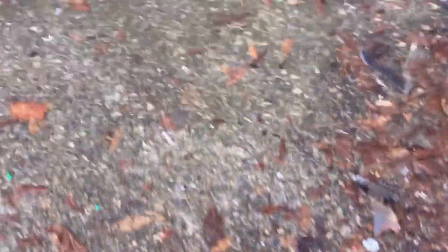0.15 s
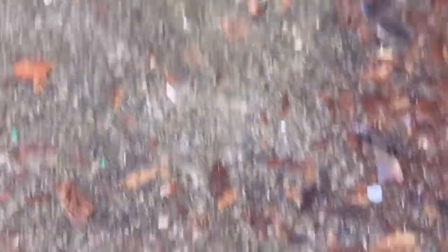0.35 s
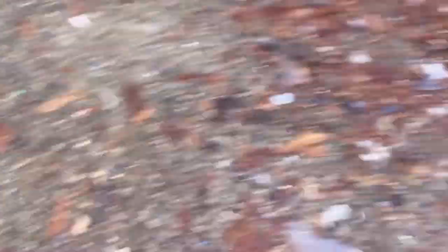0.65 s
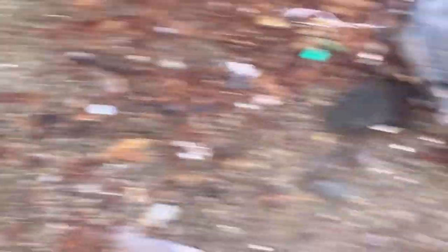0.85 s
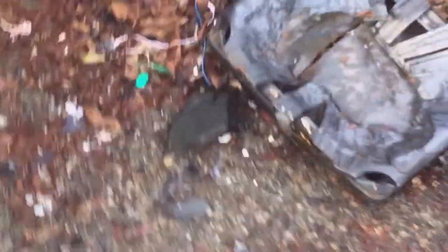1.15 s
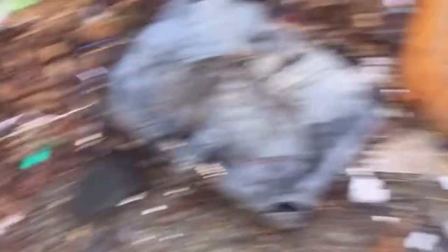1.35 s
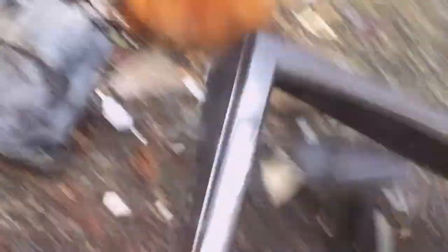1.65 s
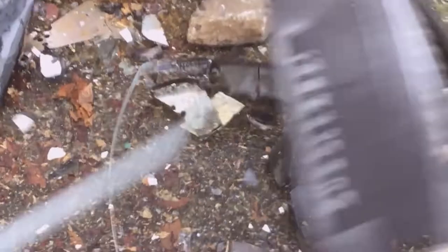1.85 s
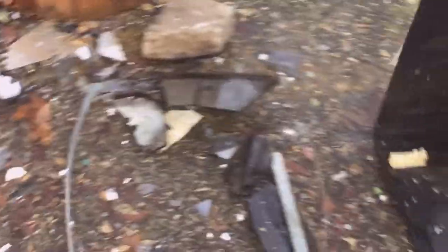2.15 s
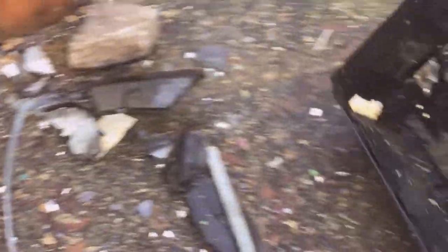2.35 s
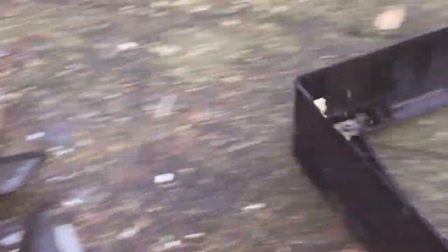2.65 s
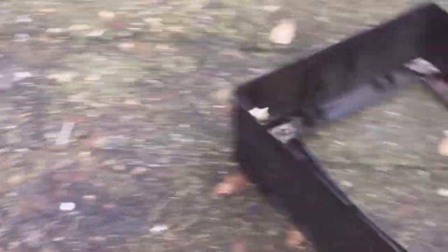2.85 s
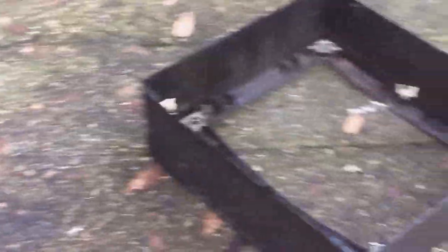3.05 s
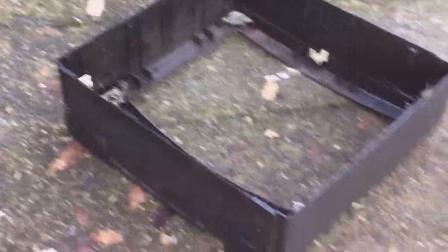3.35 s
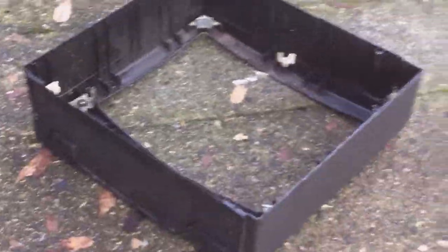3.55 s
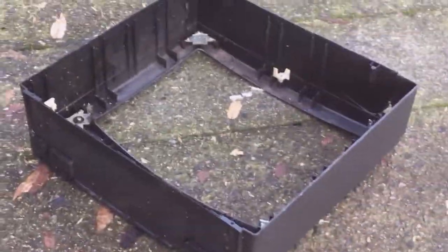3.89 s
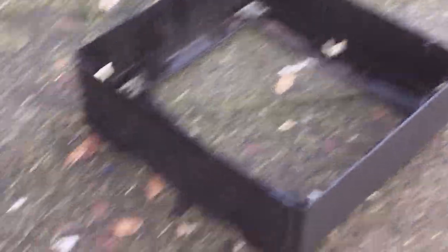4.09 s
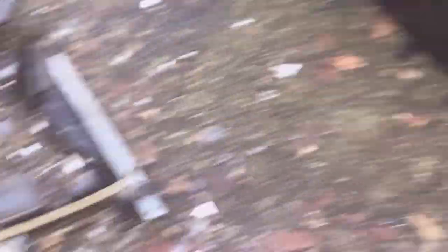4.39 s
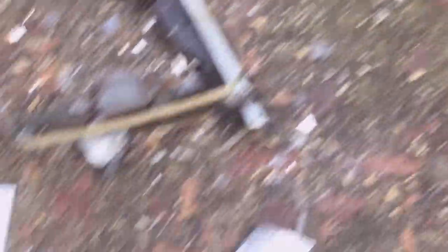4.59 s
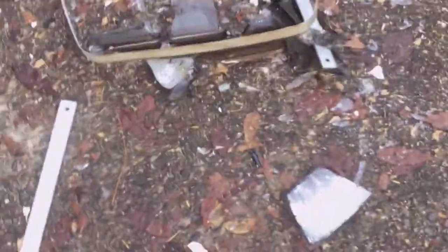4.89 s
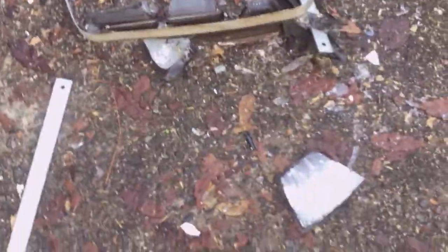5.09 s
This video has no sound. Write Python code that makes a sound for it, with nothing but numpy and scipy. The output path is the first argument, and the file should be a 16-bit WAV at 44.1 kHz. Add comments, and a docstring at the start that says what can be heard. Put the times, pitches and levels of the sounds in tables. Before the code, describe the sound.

Thick glass crashes onto concrete and rings as it bounces, with low knocks and scattering shards. A second, bigger crash follows, with metallic clangs, crunching grit and high tinkling. Then a hollow plastic casing lands with a booming thud, rattles and settles. Only a faint rustle and a distant low outdoor rumble remain. Everything happens close to a hand-held phone microphone.

```python
"""Broken glass and a plastic casing tumble over concrete, outdoors, close to a hand-held phone.
A thick slab, a long strip and small shards ring at each bounce, among cracks and crunching grit.
The hollow casing thuds, rattles and booms; its plate and corner clang. Everything comes to rest,
leaving a faint rustle and the distant low rumble of the open air."""
import sys
import numpy as np
from scipy import signal
from scipy.io import wavfile
from scipy.ndimage import uniform_filter1d

SR = 44100
rng = np.random.default_rng(int(sys.argv[2]) if len(sys.argv) > 2 else 0)


def int16_out(signal):
    """Quantize to a 16-bit WAV file."""
    q = np.round(np.clip(np.atleast_2d(signal).T, -1, 1) * 32767)
    wavfile.write(sys.argv[1], SR, q.astype(np.int16))


N = 230588

# modes of the glass pieces and the casing's plate and corner: (frequency [Hz], level [dB], t60 [s])
SLAB_MODES = [(953, -10, 0.6), (1507, -14.5, 0.52), (2364, 1.5, 0.365), (2974, -1.5, 0.2),
              (3513, -4.5, 0.3), (4070, -24, .14), (4550, -9.5, 0.14), (5347, -4, 0.25),
              (6490, -13.5, 0.45), (7500, -15, 0.2), (8400, -11.5, 0.081), (9200, -15, 0.23),
              (9900, -15, 0.11), (9900, -23.5, 0.23), (10980, -29.5, .13)]
STRIP_MODES = [(3600, -17, .4), (4460, -15, 0.3), (5165, -11, .6), (6013, -10, 0.22), (6940, -8, 0.36),
               (7980, -7.5, .3), (8965, -1.5, 0.17), (9846, -6.5, 0.3), (11170, -9.5, 0.27),
               (11080, -11, .2), (11930, -9, 0.19), (12550, -15, .25), (13190, -8.5, 0.32), (13820, -6, .2),
               (14200, -11, 0.14), (15330, -6, .2)]
SHARD_MODES = [(9470, 0.5, 0.43), (10293, -5, 1)]
SLIVER_MODES = [(2980, -1.5, 0.58), (8980, -2, 0.18), (9100, -7.5, 0.16)]
PLATE_MODES = [(990, -6.5, 0.1), (2030, -13.5, 0.19), (2610, -5.5, .08), (3000, -15.5, 0.2),
               (3613, -6, 0.14), (4370, -17.5, 0.14), (4830, -12.5, 0.18), (5270, -13.5, .18),
               (7940, -10, 0.14)]
CORNER_MODES = [(1460, 3, 0.22), (1736, 3.5, 0.21), (3150, -10.5, 0.18), (4060, -8, 0.11), (5140, -11, .15),
                (5830, -2.5, 0.059)]
# their bounces: (time [s], level [dB], best excited frequency [Hz], free ringing time [s])
SLAB_BOUNCES = [(0.0933, -3.5, 5400, 0.051), (.151, -22, 2290, 0.054), (0.24, -18.5, 2150, 0.19),
                (.361, -15, 2220, 0.22), (0.408, -17.5, 1210, 0.083), (2.004, -15.5, 3430, 0.2)]
STRIP_BOUNCES = [(1.643, -17.5, 9100, 0.012), (1.799, -15.5, 7800, 0.075), (1.986, -25, 7800, 0.078),
                 (2.057, -27, 7400, 0.1), (2.082, -28, 8000, 0.0099), (2.115, -33, 14800, .03),
                 (2.137, -22, 13500, 0.01), (2.149, -20, 13000, .015), (2.158, -21, 7600, 0.032),
                 (2.255, -30.5, 8500, 0.068), (2.328, -22, 7550, 0.052), (2.366, -27.5, 7050, 0.16),
                 (2.399, -30, 8900, 0.04), (2.40, -28, 5040, .19)]
SHARD_BOUNCES = [(1.860, -26.5, 9330, 0.068), (1.935, -20.5, 10030, 0.068), (1.968, -24, 9530, 0.018),
                 (1.999, -25.5, 9520, 0.074), (2.095, -28.5, 9630, 0.056), (2.214, -28.5, 10540, .2)]
SLIVER_BOUNCES = [(1.706, -4, 5940, 0.02)]
PLATE_BOUNCES = [(1.593, -7.5, 2487, 0.037), (1.702, -15.5, 995, .03)]
CORNER_BOUNCES = [(2.706, -16.5, 4000, 0.033), (3.03, -36.5, 4000, 0.027)]
# single tinkles, slab tones, clicks and hollow thuds: (time [s], frequency [Hz], level [dB], t60 [s])
SINGLE_NOTES = [(.001, 5030, -26.5, 0.24), (.001, 6160, -29.5, 0.1), (0.069, 1780, -9, 0.016),
                (.070, 3450, -17, 0.14), (.093, 13150, -28, 0.44), (0.069, 2560, -19, 0.12),
                (0.07, 2920, -22, 0.081), (.093, 11580, -28, 0.22), (.147, 6430, -21.5, 0.4),
                (.241, 8700, -36, 0.2), (.363, 3325, -23, 0.5), (.363, 6580, -32, 0.29),
                (0.404, 8000, -39.5, 0.61), (.636, 10870, -21, .032), (0.718, 395, -29, 0.21),
                (.755, 3800, -33, 0.047), (0.773, 10880, -23.5, 0.042), (.788, 8900, -32, 0.16),
                (.848, 3600, -20, 0.014), (0.874, 12000, -17, 0.02), (0.875, 6350, -12, 0.01),
                (.935, 2064, -39, 0.32), (0.96, 3400, -31, 0.029), (0.978, 3640, -26, 0.03),
                (0.99, 3150, -27, 0.052), (1.431, 566, -10, 0.052), (1.676, 2560, -1, 0.018),
                (1.786, 3370, -22, 0.036), (1.798, 4630, -9, 0.034), (1.730, 13040, -19, .08),
                (1.809, 4870, -23, 0.23), (2.057, 5760, -51, 0.18), (2.1415, 5630, -9.5, 0.0044),
                (2.158, 5360, -5, 0.0052)]
# hits on the concrete:
# (time [s], relative crack level [dB], thud offset [dB], splinter offset [dB], crack t60 [s])
IMPACTS = [(0.0676, -12.5, -15, -4, 0.12), (0.092, -0.5, -45, 2, 0.021), (0.172, -22, 0, 8, 0.026),
           (0.189, -17, -28.5, -6, 0.03), (0.2145, -6, -5, 9.5, 0.039), (0.223, -18, -1, -18, 0.094),
           (0.359, -19.5, -2.5, -36, 0.23), (0.384, -18, -14, -8, 0.056), (0.4073, -13.5, -35, -32, 0.05),
           (0.426, -20, -26, -19, 0.024), (0.5073, -33, 12, -13, 0.021), (0.552, -22, -19, -1, 0.16),
           (0.579, -17.5, 3, -6, 0.13), (0.6167, -16, 5, -15, 0.042), (0.6336, -26.5, -22, 15, 0.031),
           (0.721, -21.5, -12, 5, 0.016), (0.752, -39, -17, 17, 0.048), (0.7736, -22, -12, 7, 0.05),
           (.816, -26, -7, -24, 0.048), (.848, -20, -7, -11, 0.029), (0.869, -22, -0.5, 6, 0.076),
           (0.9088, -24, -4, -5, 0.07), (0.942, -36.5, 2.5, 9, 0.042), (1.0294, -43.5, -6, 22.5, 0.026),
           (1.1003, -29.5, -4.5, 6, 0.077), (1.225, -35, 11, -6, 0.11), (1.3566, -24.5, 10.5, 7.5, 0.14),
           (1.4329, -13.5, 4.5, -40, 0.054), (1.547, -23.5, 5.5, -17, 0.12), (1.581, -14.5, -20, 6, 0.092),
           (1.5946, -10, -38.5, 11.5, 0.032), (1.639, -16, 4.5, 6, 0.039), (1.6747, -5.5, 8.5, 7, 0.06),
           (1.685, -5, -10, 2, 0.069), (1.696, 0, 4.5, 6, 0.043), (1.723, -6, 4, -4, 0.27),
           (1.753, -11, -11, 0, 0.03), (1.7983, -17, 0, 13, 0.074), (1.982, -18, 0.5, -20, 0.29),
           (2.06, -37.5, 20, -13, 0.29), (2.141, -31, 9, 6, 0.027), (2.158, -19.5, -25, 18, 0.012),
           (2.202, -17.5, 1.5, -29, 0.053), (2.2263, -18, 4.5, -29, 0.097), (2.272, -20, -2, -9, 0.044),
           (2.309, -21, 6, -24, 0.084), (2.598, -19.5, 11.5, -6, 0.18), (2.61, -4, 10, -7, 0.21),
           (2.64, -4, -13, 1.5, 0.14), (2.664, -7, 7, -8.5, 0.2), (2.761, -19.5, -7, -22, 0.056),
           (2.834, -17.5, 0, -41, 0.17), (2.948, -19.5, 3.5, -14, 0.15), (2.965, -20, -15, -26.5, 0.023),
           (3.035, -40, 20.5, -26, 0.026), (3.058, -24, 1.5, -32, 0.037), (3.121, -36.5, 6, -24.5, 0.055),
           (3.251, -39.5, 11, -36.5, 0.039)]
# sliding rubble: (time [s], level [dB], brightness [dB])
RUBBLE_SLIDE = [(0.0, -33.5, -0.5), (.1, -44, 2.5), (.345, -41, -2.5), (.52, -49, 9.5), (.6, -39, 7),
                (.685, -39.5, 2), (.71, -46, -2), (.74, -46, -2.5), (.85, -41.5, -2), (1.0, -51.5, 1.5),
                (1.262, -58, 2), (1.359, -34, -2), (1.47, -35, -7.5), (1.54, -46.5, -8), (1.69, -27, 0.5),
                (1.8, -21, -5.5), (1.92, -35.5, -14), (2.04, -33.5, -6.5), (2.15, -39, 0.5),
                (2.197, -48.5, 7), (2.213, -32, -8), (2.26, -35, 0), (2.379, -39.5, -8.5),
                (2.462, -57.5, 0), (2.725, -42, -20), (2.739, -29.5, -6.5), (2.778, -25.5, -7),
                (3.004, -40.5, -13), (3.09, -60, -22.5), (3.5, -78, -11.5)]
# resonances of the hollow casing: (frequency [Hz], bandwidth [Hz], level [dB])
CASING_MODES = [(188, 33, 3), (238, 100, 4), (268.3, 23, -4), (345.2, 15, 4), (419, 150, -5.5),
                (515, 44, 0), (584, 22.6, -5), (679, 16, -4.5), (861, 55, -10), (1109, 43, -20.5),
                (1555, 37, -8.5), (1745, 17, -20), (2460, 210, -28.5)]
# the casing landing flat: (time [s], level [dB], frequency [Hz])
FLAT_LANDINGS = [(0.618, -20, 200), (2.613, -3, 215), (2.641, -7, 240), (2.944, -15, 240),
                 (3.036, -21, 230)]
# heavy blows through the ground: (time [s], level [dB], final frequency [Hz])
GROUND_KNOCKS = [(0.092, -18, 85.6), (0.1768, -15, 130), (.191, -19, 109), (0.2213, -12, 148),
                 (1.739, -13.5, 72), (2.211, -26, 83), (2.62, -13.5, 65)]
# soft scuffs in the rustle: (time [s], level [dB])
SCUFFS = [(4.22, -68.5), (4.33, -67), (4.6, -67.5), (4.81, -69), (5.04, -71)]
# spectrum of the open air: (frequency [Hz], relative density [dB])
AIR_SPECTRUM = [(15, -50), (25, -20.5), (45, -10.5), (70, -3.5), (157, -12), (185, -8), (384, -24.5),
                (416, -28.5), (734, -26), (1840, -39), (14000, -63.5), (16000, -53.5)]


def bouncing_piece(modes, bounces, fall_db, spot_db=1.5, tumble_db=2, light_tap=0, damp_s=.003):
    """Each bounce rings the modes near its contact pitch; touching the ground again damps them."""
    out = np.zeros(N)
    hz, db, t60 = np.transpose(modes)[:, :, None]
    for start, hit_db, best_hz, free_s in bounces:
        t = np.arange(int((free_s + .1) * SR)) / SR
        spot, phase, turn, spin = rng.random((4, len(modes), 1))
        db_per_octave = fall_db - light_tap * hit_db
        gain_db = hit_db + db - db_per_octave * abs(np.log2(hz / best_hz)) - 60 * t / t60
        gain_db += spot_db * (2 * spot - 1)  # the spot struck favours some modes
        gain_db += tumble_db * np.sin(2 * np.pi * (turn + (15 + 35 * spin) * t))  # lobes sweep the mic
        ring = (undb(gain_db) * np.sin(2 * np.pi * (hz * t + phase))).sum(axis=0)
        damping = np.exp(-np.clip(t - free_s, 0, None) / damp_s)
        add(out, start, ring * attack(t, .00024) * damping)
    return out


def single_notes():
    """Single fading notes: glass tinkles, lingering slab tones, sharp clicks, a few low hollow thuds."""
    out, t = np.zeros(N), np.arange(SR // 2) / SR
    for (start, hz, db, t60), (phase, speed) in zip(SINGLE_NOTES, rng.random((len(SINGLE_NOTES), 2))):
        waver_db = 3.5 * np.sin(2 * np.pi * (phase + (20 + 40 * speed) * t))
        add(out, start, note(t, hz, db + waver_db, t60, rise_s=.0004))
    return out


def crumbs(lo_hz, hi_hz, t60, hits_per_s=1200, count=60):
    """Tiny pieces, each struck at random and ringing briefly on its own pitch."""
    out = np.zeros(N)
    pole = np.exp(-np.log(1000) / (t60 * SR))
    for hz in lo_hz * (hi_hz / lo_hz) ** rng.random(count):
        hits = rng.random(N) < hits_per_s / count / SR
        hit_db = -3 * np.log2(hz / lo_hz) + 4.5 * np.minimum(rng.exponential(size=N), 2.5)
        angle = 2 * np.pi * hz / SR
        feedback = [1, -2 * pole * np.cos(angle), pole ** 2]
        out += signal.lfilter([np.sin(angle)], feedback, hits * undb(hit_db))
    return unit(out)


def impacts(pieces, dust):
    """Close hits on concrete: a tick of first contact, a crack, splintering and a slower casing thud."""
    starts, crack_db, thud_db, splinter_db, t60 = np.transpose(IMPACTS)
    shock = grains(3000, 3, .0006)
    rise_s = .0015 + .017 * t60  # a longer crack also swells more slowly
    crack = hiss(shock, 770, 4160) + undb(-4.5) * pieces
    crack *= fading(starts, crack_db - 5, t60, rise_s)
    splinter = hiss(shock, 4400, 16000) + undb(-2.5) * dust
    splinter *= fading(starts, crack_db + splinter_db - 4.5, .61 * t60, rise_s)
    tick = hiss(1, 1500, 18000) * fading(starts, crack_db + .42 * splinter_db - 14.5, .0069, rise_s / 4)
    thud_envelope = fading(starts, crack_db + thud_db - 8.5, .18 + .465 * t60, rise_s + .0033)
    thud = casing(grains(1500, .73, .0027) * rng.standard_normal(N) * thud_envelope)
    return tick + crack + splinter + thud


def clacks():
    """Each impact strikes another fragment: eight short notes at pitches of its own."""
    out, t = np.zeros(N), np.arange(SR // 8) / SR
    for start, crack_db, _, splinter_db, _ in IMPACTS:
        pitch, weakness, life = rng.random((3, 8, 1))
        db = crack_db - 11 + min(splinter_db, 3) * pitch - 10 * weakness
        notes = note(t, 1000 * 9 ** pitch, db, t60=.03 * (.91 + life), rise_s=.00039)
        add(out, start, notes.sum(axis=0))
    return out


def rubble(pieces, dust):
    """Dense small contacts rattle the casing, scrape and crunch; grit gains what the casing loses."""
    times, levels, brightness = np.transpose(RUBBLE_SLIDE)
    t = np.arange(N) / SR
    scrape_db = np.interp(t, times, levels) - 60 * np.clip(t - times[-1], 0, None)
    bright_db = np.interp(t, times, brightness)
    rattle_db, grit_db = scrape_db + .5 - bright_db, scrape_db - 1.5 + bright_db
    contacts = grains(700, 2.5, .003)
    rattle = casing(grains(1400, .7, .004) * rng.standard_normal(N) * undb(rattle_db))
    scrape = (hiss(contacts, 600, 4000) + undb(-10) * pieces) * undb(scrape_db)
    grit = (hiss(contacts, 2400, 17000) + undb(-4) * dust) * undb(grit_db + 2.4 * walk(54))
    return rattle + scrape + grit


def casing(shaking):
    """The hollow plastic rings with what shakes it; white noise keeps its level."""
    def ring(x):
        modes = (undb(db) * signal.lfilter(*signal.iirpeak(hz, hz / width, fs=SR), x)
                 for hz, width, db in CASING_MODES)
        return band(sum(modes), 140, 2600)
    return ring(shaking) / np.linalg.norm(ring(signal.unit_impulse(SR // 4)))


def booms():
    """The air in the casing swings for a few low cycles as it lands flat."""
    out, t = np.zeros(N), np.arange(SR // 8) / SR
    for start, db, hz in FLAT_LANDINGS:
        add(out, start, note(t, hz, db, t60=.09, rise_s=.003))
    return out


def knocks(sag_s=.002, t60_cycles=7):
    """Heavy blows arrive through the ground: a slow push and rebound, falling in pitch."""
    out, t = np.zeros(N), np.arange(SR // 4) / SR
    warped_t = t + 4 * sag_s * attack(t, sag_s)  # starts at five times the final pitch
    for start, db, hz in GROUND_KNOCKS:
        envelope = undb(db - 60 * t * hz / t60_cycles) * attack(t, .00024)
        add(out, start, envelope * np.sin(2 * np.pi * hz * warped_t))
    return out


def rustle(floor_db=-88, swell_db=2.5):
    """Faint, fine hiss swells at random, with soft scuffs once the glass lies still."""
    starts, db = np.transpose(SCUFFS)
    brushing = hiss(grains(2500, 1.2, .004), 2300, 12000)
    scuffs = fading(starts, db, t60s=.7, rises_s=.06)
    return brushing * (scuffs + undb(floor_db)) * undb(swell_db * walk(9))


def open_air(level_db=-49.5):
    """Distant outdoor rumble in half-octave bands that each waver on their own."""
    out = np.zeros(N)
    hz_at, db_at = np.transpose(AIR_SPECTRUM)
    for hz in 28 * 2 ** np.arange(0, 9.2, .5):
        db = np.interp(np.log(hz), np.log(hz_at), db_at) + 2.7 * walk(4.3)
        out += undb(db) * band(rng.standard_normal(N), hz * 2 ** -.25, hz * 2 ** .25)
    return unit(out) * undb(level_db)


def grains(per_s, spread_db, tail_s):
    """Loudness of random small contacts of uneven size, each with a short tail."""
    clicks = (rng.random(N) < per_s / SR) * undb(spread_db * rng.exponential(size=N))
    return unit(signal.lfilter([1], [1, -np.exp(-1 / (tail_s * SR))], clicks))


def hiss(contacts, lo_hz, hi_hz):
    """A band of noise played by the given contacts."""
    return unit(band(contacts * rng.standard_normal(N), lo_hz, hi_hz))


def fading(starts, dbs, t60s, rises_s):
    """Envelope that swells from each start and fades; powers add."""
    power, t = np.zeros(N), np.arange(SR // 2) / SR
    for start, db, t60, rise_s in np.broadcast(starts, dbs, t60s, rises_s):
        add(power, start, (undb(db - 60 * t / t60) * attack(t, rise_s)) ** 2)
    return np.sqrt(power)


def note(t, hz, db, t60, rise_s):
    """A struck, fading sine."""
    return undb(db - 60 * t / t60) * np.sin(2 * np.pi * hz * t) * attack(t, rise_s)


def attack(t, rise_s):
    """Exponential rise from 0 to 1."""
    return 1 - np.exp(-t / rise_s)


def walk(per_s):
    """Gliding random levels with a spread near 1."""
    hold = int(SR / per_s)
    return uniform_filter1d(np.repeat(rng.standard_normal(N // hold + 1), hold), hold)[:N]


def band(x, lo_hz, hi_hz):
    """Band-pass."""
    return signal.sosfilt(signal.butter(2, [lo_hz, hi_hz], "band", fs=SR, output="sos"), x)


def add(out, start_s, sound):
    """Mix a sound in from start_s on."""
    i = int(start_s * SR)
    out[i:i + len(sound)] += sound[:N - i]


def undb(db):
    """Gain of a dB value."""
    return 10 ** (np.asarray(db) / 20)


def unit(x):
    """Scaled to rms 1."""
    return x / np.sqrt(np.mean(x ** 2))


def scene():
    """Glass and casing close to the microphone, the open air far behind; mono."""
    slab = bouncing_piece(SLAB_MODES, SLAB_BOUNCES, fall_db=6, light_tap=.4)
    strip = bouncing_piece(STRIP_MODES, STRIP_BOUNCES, fall_db=12, spot_db=4, tumble_db=3, damp_s=.02)
    shard = bouncing_piece(SHARD_MODES, SHARD_BOUNCES, fall_db=78, tumble_db=4)
    sliver = bouncing_piece(SLIVER_MODES, SLIVER_BOUNCES, fall_db=5, spot_db=1)
    plate = bouncing_piece(PLATE_MODES, PLATE_BOUNCES, fall_db=5)
    corner = bouncing_piece(CORNER_MODES, CORNER_BOUNCES, fall_db=5)
    pieces, dust = crumbs(1000, 6500, t60=.051), crumbs(4000, 15500, t60=.046)
    ringing = slab + strip + shard + sliver + plate + corner + single_notes()
    crunch = impacts(pieces, dust) + clacks() + rubble(pieces, dust)
    return (ringing + crunch + booms() + knocks() + rustle() + open_air())[None]


def record(dry):
    """The hand-held phone drops the deepest bass, rounds the loudest peaks and cuts the top."""
    thinned = signal.sosfilt(signal.butter(3, 42, "high", fs=SR, output="sos"), dry)
    rounded = np.tanh(1.095 * thinned) / 1.287
    return signal.sosfilt(signal.ellip(10, .2, 70, 15900, fs=SR, output="sos"), rounded)


dry = scene()
out = record(dry)
int16_out(out)
```